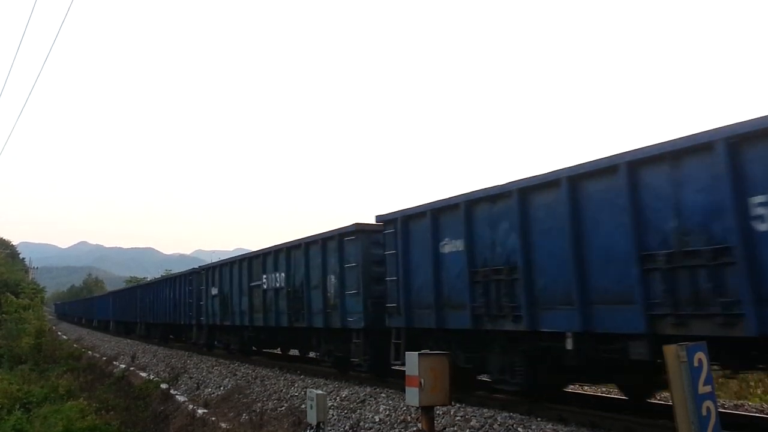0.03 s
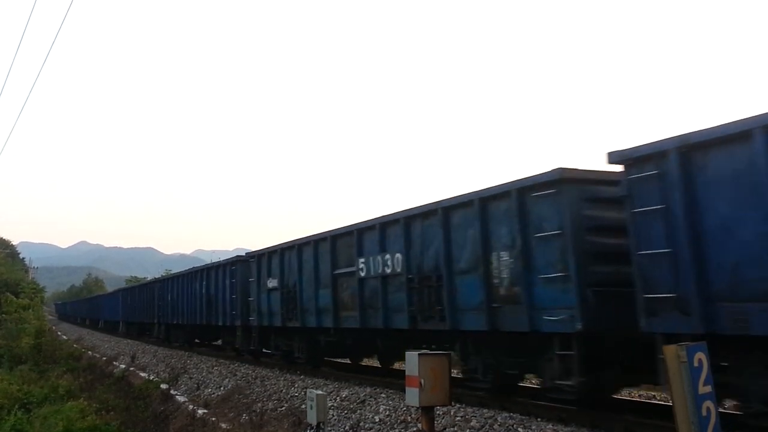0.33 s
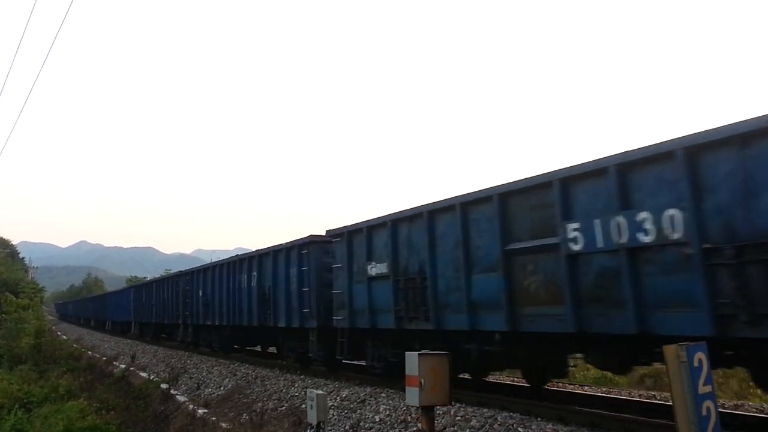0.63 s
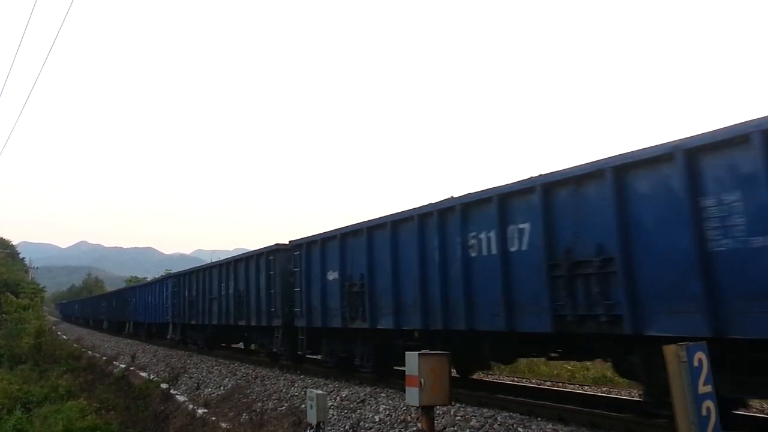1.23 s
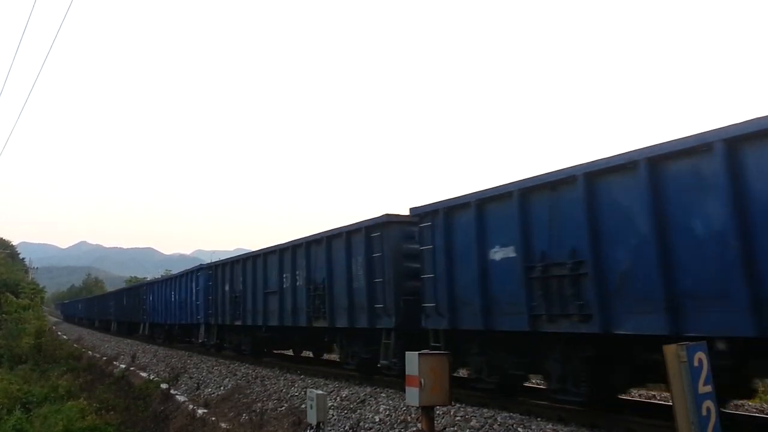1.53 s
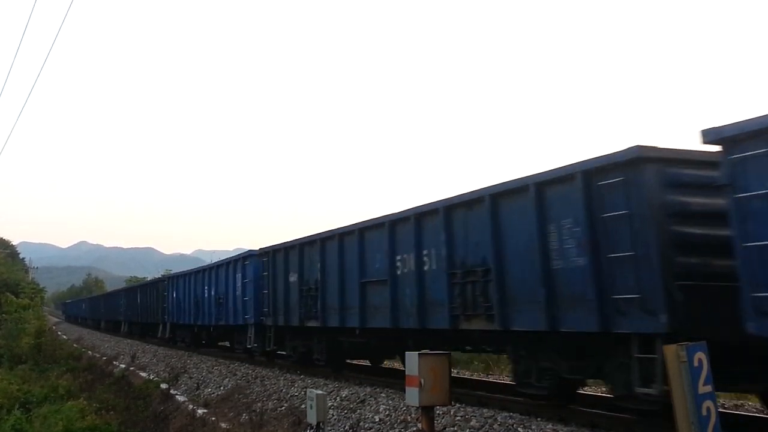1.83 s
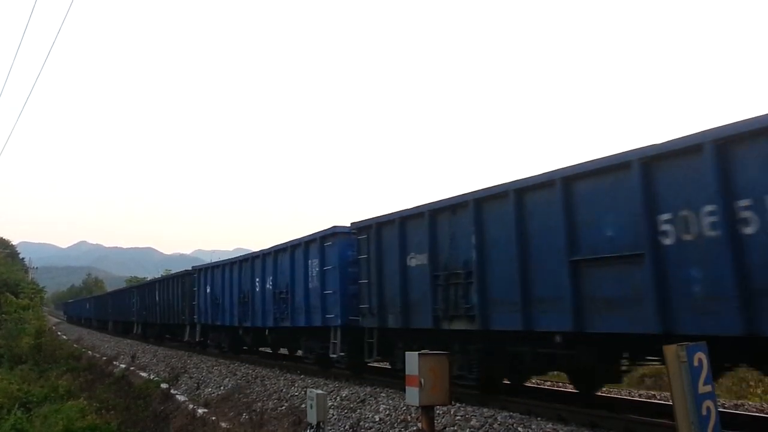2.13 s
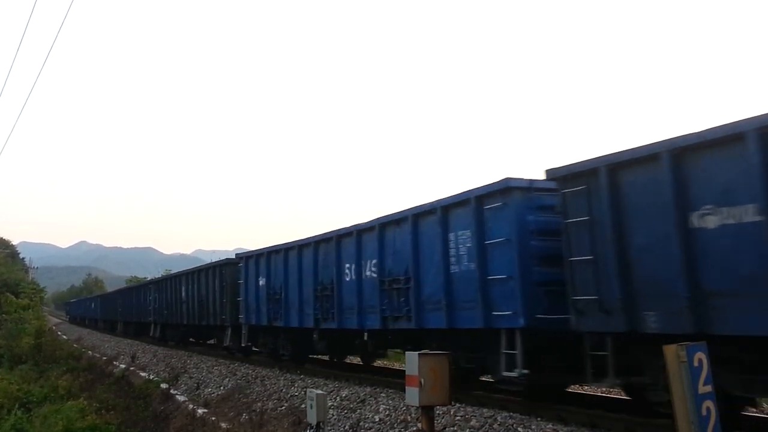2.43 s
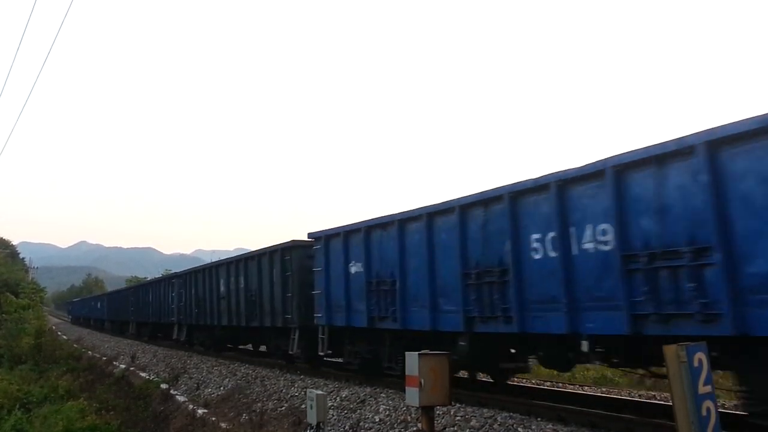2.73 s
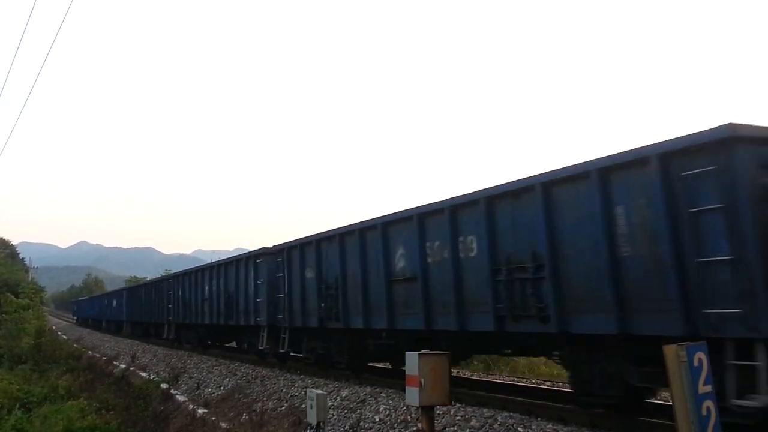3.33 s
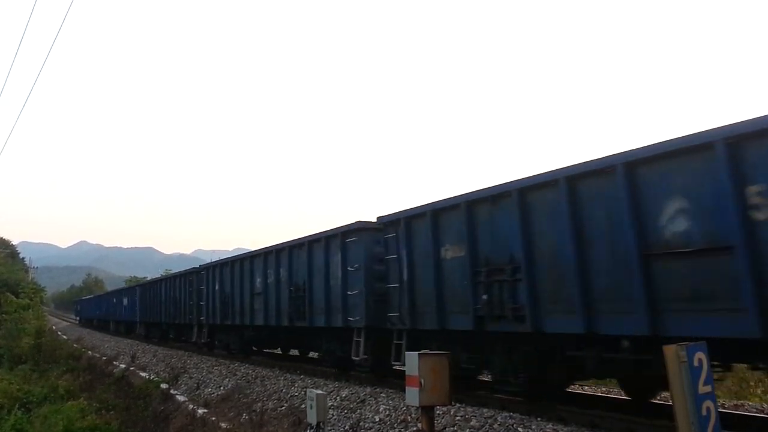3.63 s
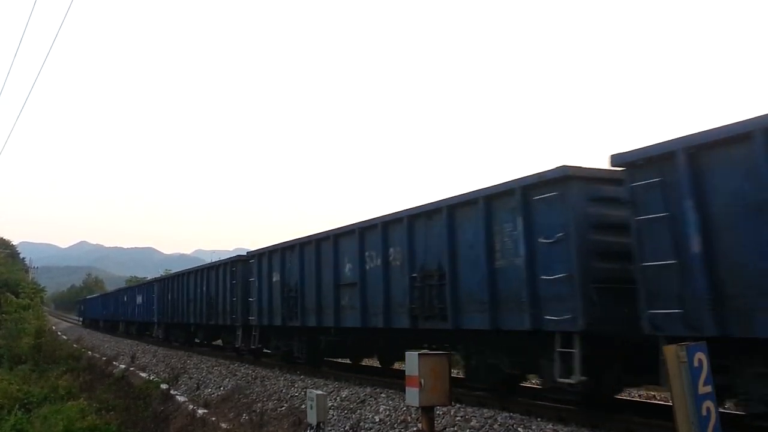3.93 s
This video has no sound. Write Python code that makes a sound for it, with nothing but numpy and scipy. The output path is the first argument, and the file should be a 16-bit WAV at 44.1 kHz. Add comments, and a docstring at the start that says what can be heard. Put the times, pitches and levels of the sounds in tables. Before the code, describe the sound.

A freight train of open wagons rolls steadily past a few metres from the microphone. Over continuous rumble and wheel hiss, sharp clacks come in pairs from a rail joint, with brief steel squeaks and occasional coupling clunks.

```python
"""Beside a railway line, a stereo microphone a few metres from the track.
A freight train of open wagons rolls past at a steady speed: the bodies rumble, the wheels roar on
the rails, and each two-axle bogie clacks twice over a rail joint; distant joints give dull knocks.
Steel fittings chirp and squeal, flanges rub, single wheels ring or sing, and couplings clunk.
The loudest clacks overload the recorder."""
import sys
import numpy as np
from scipy import signal
from scipy.fft import rfft, irfft
from scipy.io import wavfile

SR = 44100
rng = np.random.default_rng(int(sys.argv[2]) if len(sys.argv) > 2 else 0)


def materialize(psi):
    """Save the field psi as 16-bit PCM at rate SR to the path in sys.argv[1].

    A 1-D psi becomes a single channel; in a 2-D psi each row is a channel.
    """
    bounded = np.clip(np.atleast_2d(psi).T, -1, 1)
    quanta = np.round(bounded * 32767).astype(np.int16)
    wavfile.write(sys.argv[1], SR, quanta)


N = 176400
TIME = np.arange(N) / SR
BINS_HZ = np.maximum(np.arange(N // 2 + 1) * SR / N, 1)
RIGHT_LAG_S, CLACK_LAG_S = 0.000415, 0.00039   # later arrival at the right microphone
STRIKE_RISE_S = 0.0004   # first contact of wheel and joint

# likeness of the left and right microphones: f/Hz, coherence
MIC_COHERENCE = [(30, .5), (120, 0.76), (300, 1), (700, 0.61), (1500, 0.43), (2800, 0.35), (4500, 0.48),
                 (6000, 0.19), (9000, 0.19), (14000, .05)]
# balance of the microphones: f/Hz, left minus right/dB
MIC_BALANCE = [(100, -0.5), (2000, 0), (3600, 0.9), (5000, -0.5), (8000, -1), (9500, -1), (11000, 10.5),
               (12800, 7), (14200, 19.5)]
# rumble of the wagon bodies: t/s, level/dB
RUMBLE_LEVEL = [(0, -20.5), (.3, -19), (.5, -13.5), (.62, -19), (.83, -20.5), (.92, -16), (1.33, -16.5),
                (1.5, -19), (1.98, -16.5), (2.5, -17.5), (2.72, -12.5), (2.96, -22), (3.1, -17),
                (3.4, -15.5), (3.7, -22), (4, -16)]
# spectrum of the rumble: f/Hz, relative density/dB
RUMBLE_SPECTRUM = [(25, -57), (110, -42), (160, -19), (220, -11), (285, -3), (365, 1.5), (550, 2),
                   (780, 0.5), (1000, -13), (1400, -9.5), (2200, -20.5), (5000, -65)]
# dull low knocks in the rumble, from wheels on distant rail joints: t/s, level/dB
DISTANT_KNOCKS = [(.44, -25), (0.561, -8.5), (.65, -10), (1.068, -8.5), (1.288, -6.5), (1.868, -7),
                  (2.593, -8.5), (2.728, -7.5), (3.439, -10), (3.829, -7)]
# rolling hiss: t/s, level/dB
HISS_LEVEL = [(0, -12.5), (.3, -14.5), (.55, -15), (1.0, -14), (1.55, -13.5), (1.9, -14.5), (2.3, -14),
              (2.65, -15), (3.25, -15), (3.5, -14), (3.7, -17), (3.85, -12), (4, -14.5)]
# spectrum of the hiss: f/Hz, relative density/dB
HISS_SPECTRUM = [(200, -52), (700, 2), (1100, 4.5), (1500, -2), (2100, 1), (3600, 1.5), (3950, -2.5),
                 (4450, -3.5), (5200, -6), (6000, -11), (7400, -9.5), (8500, -9.5), (11000, -21),
                 (12700, -17), (14500, -27)]
# singing of the rolling steel: f/Hz, width/Hz, relative level/dB
RAIL_MODES = [(1625, 21, 0.5), (4240, 390, 4.5)]
# wheels striking the joint, relative levels: t/s, crack/dB, rattle/dB, thump/dB
CLACKS = [(0.013, -4.5, -8, -29), (.160, 0.5, -14, -28), (.253, -1.5, -9.5, -34), (.636, -3, -9, -32),
          (0.7285, -1.5, -13.5, -44), (.8793, 0.5, -17, -28), (.9715, -7, -10.5, -42),
          (1.3214, -8, -22, -30), (1.3526, -6, -6, -21), (1.4472, -7.5, -16, -35), (1.5963, -4, -12, -30),
          (1.6882, -1, -13, -38), (2.0721, -1, -9.5, -21), (2.166, -1, -12, -29), (2.314, -0.5, -8, -22),
          (2.4065, -2, -11.5, -36), (2.7911, -0.5, -9, -27), (2.8848, -6, -10.5, -27),
          (3.033, -2, -12.5, -28), (3.1266, -0.5, -5.5, -20), (3.5118, -3, -5, -25),
          (3.6044, -5.5, -11.5, -44), (3.755, -7, -7.5, -45), (3.8286, -22, -18, -40),
          (3.849, -11, -18, -43)]
# spectrum of crack and rattle: f/Hz, relative density/dB
CLACK_SPECTRUM = [(60, -37), (150, -15), (350, -4.5), (800, 4.5), (1450, -0.5), (1950, 4.5), (2400, 2.5),
                  (2950, -2.5), (3650, -5), (4700, -5), (6000, -22), (8000, -20), (14000, -31)]
# ping of first contact: f/Hz, relative level/dB, t60/s
STRIKE_MODES = [(976, -14.5, 0.011), (2224, 0, 0.0075), (2750, 8.5, 0.0033)]
# a short low thump under each loud clack: f/Hz, relative level/dB, t60/s
THUMP_MODES = [(85, -2, 0.039)]
# wheel modes rung by every clack: f/Hz, width/Hz, relative level/dB
WHEEL_MODES = [(2110, 120, -20), (2690, 79, -1), (2800, 38, 10)]
# thin squeals and scrapes: t/s, length/s, f/Hz, level/dB
SQUEALS = [(0.175, 0.033, 7070, -19.5), (0.287, 0.031, 7070, -24), (.385, 0.14, 6950, -33),
           (0.783, 0.06, 7020, -36), (3.204, .025, 7370, -19.5), (3.263, .08, 7150, -29),
           (0.039, 0.038, 4450, -17), (0.972, .033, 4430, -28), (2.2, .04, 4250, -22)]
# stick-slip chirps: t/s, length/s, relative level/dB, wheel ring/dB
CHIRPS = [(0.269, .016, -10, -19.5), (1.114, .0093, -8.5, -17.5), (1.941, 0.012, -3.5, -29),
          (2.002, 0.0024, -12, -40), (2.7846, 0.0076, -3, -19.5), (2.82, 0.0033, -9.5, -38),
          (2.847, 0.0036, -14, -40), (3.618, 0.016, -12, -23)]
# upper wheel modes rung by every chirp: f/Hz, width/Hz, relative level/dB
UPPER_WHEEL_MODES = [(5566, 24, 0), (8884, 18, -9), (10753, 22, -17)]
# a flange rubs along the rail: t/s, level/dB
FLANGE_RUBS = [(.19, -21), (.75, -24), (.93, -26), (1.12, -26.5), (1.68, -26), (2.42, -27), (3.19, -18),
               (3.33, -21), (3.56, -19.5)]
# resonances of the rubbing flange: f/Hz, width/Hz, relative level/dB
FLANGE_MODES = [(7400, 920, 0), (9000, 1400, -2), (12760, 610, 0)]
# a wheel sings on one low mode: t/s, length/s, level/dB
WHEEL_SINGING = [(0.464, 0.056, -21), (2.777, 0.052, -20)]
# a wheel struck squarely rings on at its own pitch: t/s, f/Hz, level/dB
WHEEL_RINGS = [(.638, 2736, -27), (2.409, 2855, -15.5), (2.793, 2847, -15), (3.515, 2780, -10)]
# a coupling clunks: t/s, level/dB
COUPLING_CLUNKS = [(.74, -18), (1.209, -15), (2.871, -7.5)]
# hollow resonance of a coupling: f/Hz, width/Hz, relative level/dB
COUPLING_MODES = [(784, 93, 0)]


def from_db(db):
    """Decibels to gain."""
    return 10 ** (np.asarray(db) / 20)


def unit_rms(x):
    """Scale to unit rms."""
    return x / np.sqrt(np.mean(x ** 2) + 1e-20)


def over_time(points):
    """A curve at every sample."""
    return np.interp(TIME, *np.transpose(points))


def over_hz(points):
    """A curve at every frequency, interpolated in log frequency."""
    hz, value = np.transpose(points)
    return np.interp(np.log(BINS_HZ), np.log(hz), value)


def drift(rate_hz):
    """Random wander of unit rms, mostly slower than rate_hz."""
    white = rfft(rng.standard_normal(N))
    return unit_rms(irfft(white / (1 + (BINS_HZ / rate_hz) ** 2), N))


def resonances(modes):
    """Gain of a set of resonances at every frequency."""
    powers = (from_db(db) ** 2 / width / (1 + ((BINS_HZ - hz) / width) ** 2) ** 2
              for hz, width, db in modes)
    return np.sqrt(sum(powers))


def mic_noise(gain, lag_s=RIGHT_LAG_S, flicker_db=0, direct=0):
    """Coloured noise of unit rms at the two microphones; direct sound makes them more alike."""
    coherence = over_hz(MIC_COHERENCE)
    coherence = np.clip(coherence + direct * (1 - coherence), 0, 1)
    mid, side = rfft(rng.standard_normal((2, N))) * np.sqrt([1 + coherence, 1 - coherence]) * gain
    balance = from_db(over_hz(MIC_BALANCE) / 2)
    delay = np.exp(-2j * np.pi * BINS_HZ * lag_s)
    pair = np.array([(mid + side) * balance, (mid - side) / balance * delay])
    if not flicker_db:
        return unit_rms(irfft(pair, N))
    # each half octave flickers by itself
    half_octave = np.clip(2 * np.log2(BINS_HZ / 125), 0, 14)
    bands = (irfft(pair * np.maximum(1 - abs(half_octave - k), 0), N) for k in range(15))
    return unit_rms(sum(band * from_db(flicker_db * drift(9.5)) for band in bands))


def blows(times, dbs, rise_s, t60):
    """Envelope of blows that rise quickly and die away; their powers add."""
    clicks = np.zeros(N)
    np.add.at(clicks, np.clip((times * SR).astype(int), 0, N - 1), from_db(dbs) ** 2)
    rise, fall = np.exp(-1 / (rise_s * SR)), from_db(-60 / (t60 * SR)) ** 2
    power = signal.lfilter([1], [1, -fall], clicks + 1e-18)
    return np.sqrt(signal.lfilter([1 - rise], [1, -rise], power))


def struck(times, dbs, modes):
    """Each blow rings heavily damped modes, reaching the left microphone first."""
    age = TIME[:SR // 10]
    ping = sum(from_db(db - 60 * age / t60) * np.sin(2 * np.pi * hz * age) for hz, db, t60 in modes)
    ping *= 1 - np.exp(-age / STRIKE_RISE_S)
    clicks = np.zeros((2, N))
    for channel, lag_s in zip(clicks, (0, CLACK_LAG_S)):
        channel[np.round((times + lag_s) * SR).astype(int)] = from_db(dbs)
    return signal.fftconvolve(clicks, ping[None], axes=1)[:, :N]


def steel_tone(start, length, hz, db, waver_hz, rise_s, t60):
    """A wavering tone that builds up, holds and rings out, at both microphones."""
    age = np.maximum(TIME - start, 0)
    decay_db = 60 * np.clip((age - length) / t60, 0, 2)
    level = (1 - np.exp(-age / rise_s)) * from_db(db - decay_db)
    phase = 2 * np.pi * np.cumsum(hz + waver_hz) / SR
    return np.sqrt(2) * level * np.sin([phase, phase - 2 * np.pi * hz * RIGHT_LAG_S])


def wagon_rumble():
    """The empty steel boxes rumble; wheels on distant rail joints add dull low knocks."""
    knocks = blows(*np.transpose(DISTANT_KNOCKS), rise_s=0.005, t60=0.18)
    level = np.hypot(from_db(over_time(RUMBLE_LEVEL)), knocks)
    return level * mic_noise(from_db(over_hz(RUMBLE_SPECTRUM)), lag_s=0.00035, flicker_db=1.84)


def rolling(ticks_per_s=70):
    """Wheels hiss and sing on the rails while small loose parts tick at random."""
    when, size = rng.random((int(ticks_per_s * N / SR), 2)).T
    tick_db = -19 + 3.5 * np.minimum(-np.log(size), 3)   # many faint, a few loud
    ticks = blows(when * N / SR, tick_db, rise_s=0.00041, t60=0.03)
    level = np.hypot(from_db(over_time(HISS_LEVEL)), ticks)
    hiss = level * mic_noise(from_db(over_hz(HISS_SPECTRUM)), flicker_db=2.0)
    singing = from_db(-25.5) * mic_noise(resonances(RAIL_MODES))
    return hiss + singing


def joint_clacks():
    """Each wheel cracks on the joint, shakes its bogie and rings, with a short low thump beneath."""
    times, crack_db, rattle_db, thump_db = np.transpose(CLACKS)
    strike = struck(times, crack_db + 8.5, STRIKE_MODES)
    thump = struck(times, thump_db, THUMP_MODES)
    crack = blows(times, crack_db, STRIKE_RISE_S, t60=0.052)
    rattle = blows(times, rattle_db, rise_s=0.005, t60=0.2) * from_db(2.0 + 0.39 * drift(150))
    ring = mic_noise(resonances(WHEEL_MODES), CLACK_LAG_S, direct=0.6)
    ring *= blows(times, rattle_db - 5.5, rise_s=0.005, t60=0.2)
    clatter = mic_noise(from_db(over_hz(CLACK_SPECTRUM)), CLACK_LAG_S, direct=0.77)
    clatter *= np.hypot(crack, rattle)
    return strike + clatter + ring + thump


def fittings(chirp_hz=4103, chirp_waver_hz=40.7, squeal_waver=0.022, squeal_rough_db=4):
    """Steel rubs on steel: rough squeals, and stick-slip chirps that leave the wheel ringing."""
    waver = drift(190)
    starts, _, _, ring_db = np.transpose(CHIRPS)
    ring = mic_noise(resonances(UPPER_WHEEL_MODES), direct=0.15)
    ring *= blows(starts, ring_db, rise_s=0.0077, t60=0.55)
    chirps = sum(steel_tone(t, length, chirp_hz, db, chirp_waver_hz * waver, rise_s=0.00032, t60=0.057)
                 for t, length, db, _ in CHIRPS)
    chirps *= from_db(1.2 * drift(400) + [[-2.0], [2.5]])   # grainy, louder at the right microphone
    squeals = sum(steel_tone(t, length, hz, db, squeal_waver * hz * waver, rise_s=0.0046, t60=0.16)
                  for t, length, hz, db in SQUEALS)
    squeals *= from_db(squeal_rough_db * np.array([drift(70), drift(70)]))
    return squeals + chirps + ring


def flanges():
    """A flange touches the rail with a bright hiss that fades."""
    level = blows(*np.transpose(FLANGE_RUBS), rise_s=0.04, t60=0.44)
    return level * mic_noise(resonances(FLANGE_MODES))


def wheel_tones(singing_hz=1622, rise_s=0.0046, t60=0.35):
    """Single wheels sing for a moment as they roll, or ring on after a blow."""
    waver_hz = 11.6 * drift(103)
    singing = sum(steel_tone(t, length, singing_hz, db, waver_hz, rise_s, t60)
                  for t, length, db in WHEEL_SINGING)
    rings = sum(steel_tone(t, 0, hz, db, waver_hz, rise_s, t60) for t, hz, db in WHEEL_RINGS)
    return singing + rings


def couplings():
    """Slack in a coupling is taken up with a hollow clunk."""
    level = blows(*np.transpose(COUPLING_CLUNKS), rise_s=0.003, t60=0.19)
    return level * mic_noise(resonances(COUPLING_MODES))


def scene():
    """The whole train from the trackside, a few metres off."""
    return wagon_rumble() + couplings() + joint_clacks() + wheel_tones() + fittings() + rolling() + flanges()


def record(dry):
    """The recorder clips the peaks while the bass stays clean; the top is cut."""
    bass_hz, cutoff_hz = 170, 14550
    highpass = signal.butter(2, bass_hz, "high", fs=SR, output="sos")
    distortion = signal.sosfiltfilt(highpass, np.clip(dry, -1, 1) - dry)
    lowpass = signal.ellip(10, 0.05, 50, cutoff_hz, fs=SR, output="sos")
    return signal.sosfiltfilt(lowpass, dry + distortion)


dry = scene()
out = record(dry)
materialize(out)
```